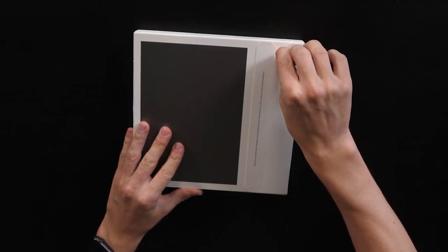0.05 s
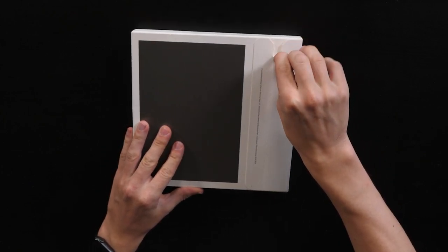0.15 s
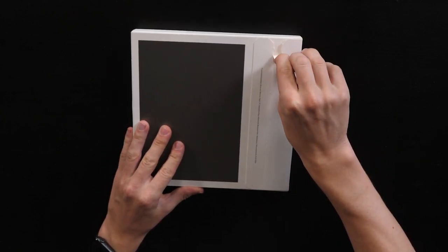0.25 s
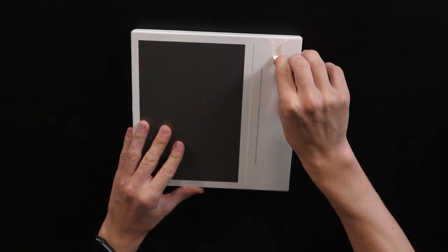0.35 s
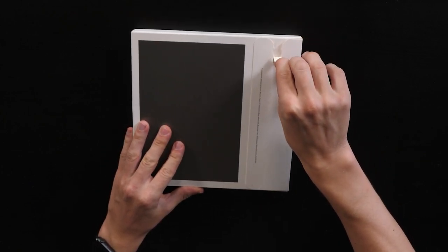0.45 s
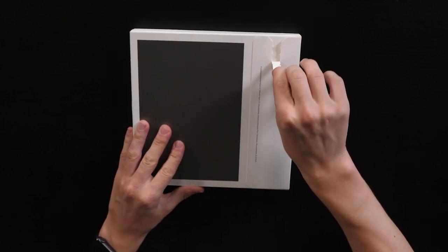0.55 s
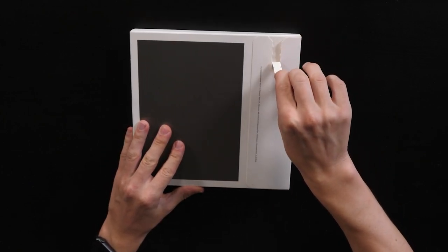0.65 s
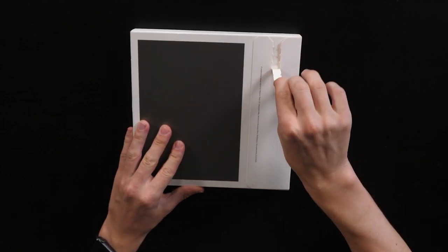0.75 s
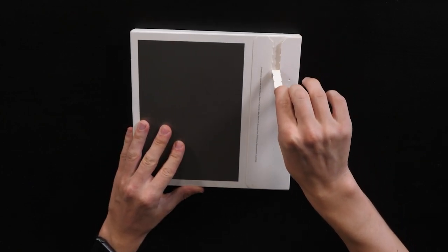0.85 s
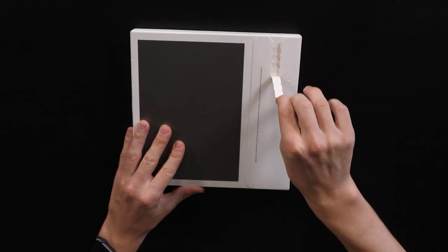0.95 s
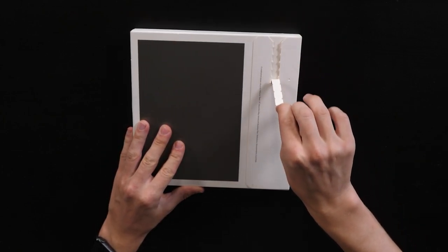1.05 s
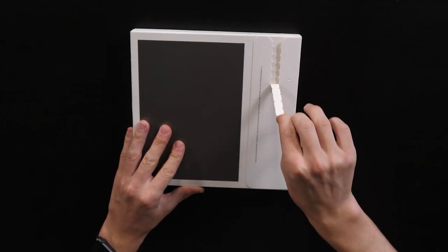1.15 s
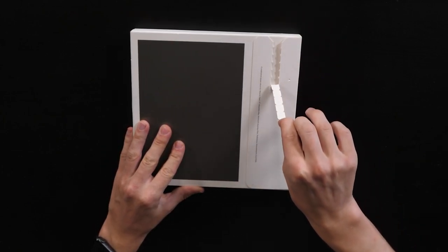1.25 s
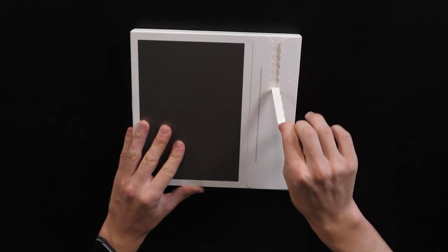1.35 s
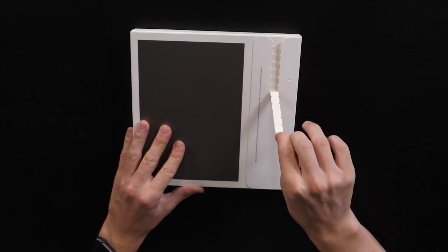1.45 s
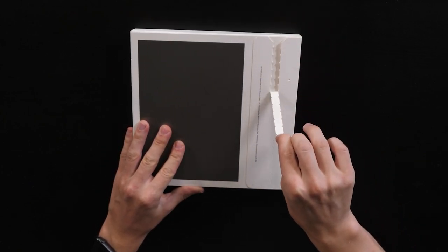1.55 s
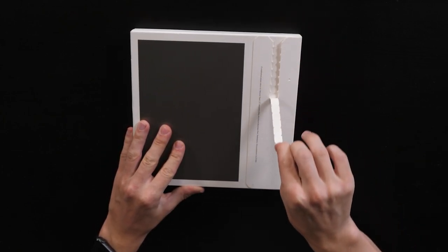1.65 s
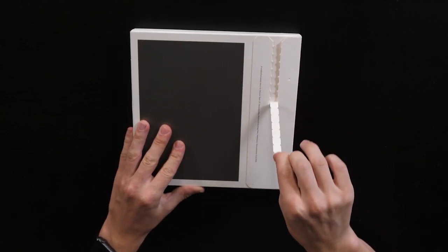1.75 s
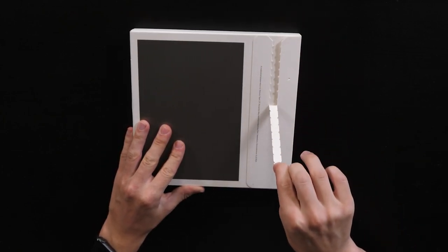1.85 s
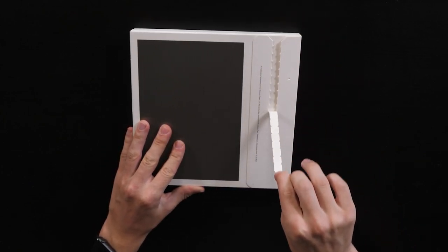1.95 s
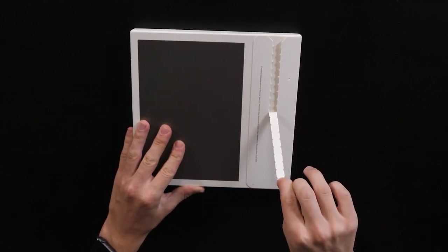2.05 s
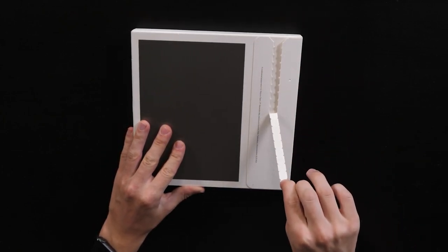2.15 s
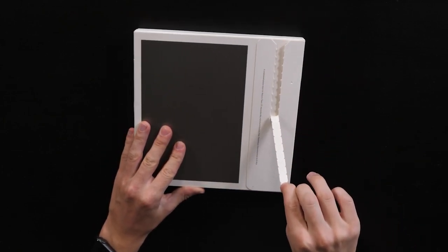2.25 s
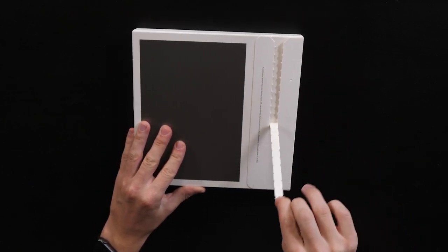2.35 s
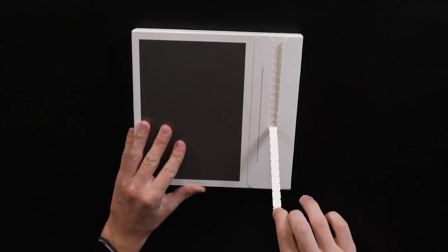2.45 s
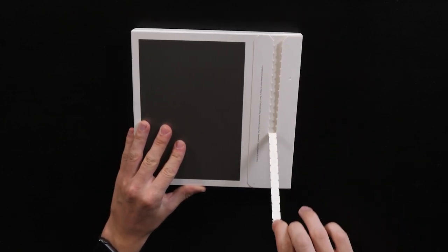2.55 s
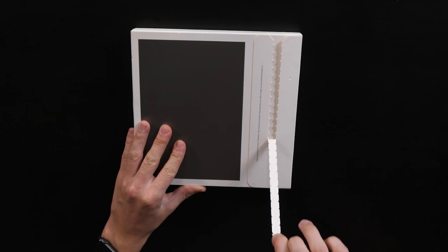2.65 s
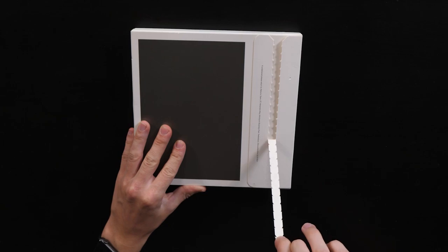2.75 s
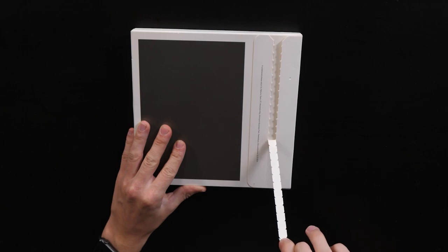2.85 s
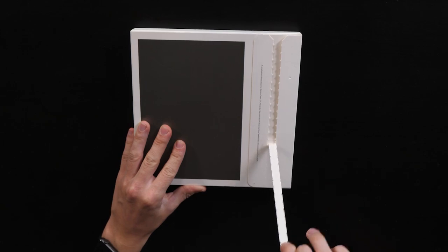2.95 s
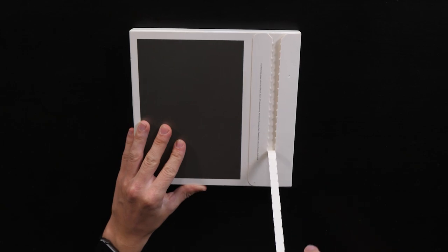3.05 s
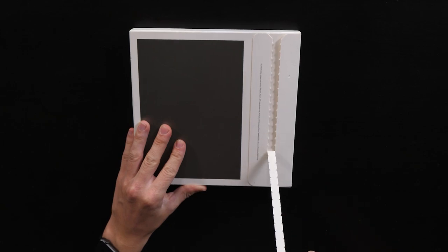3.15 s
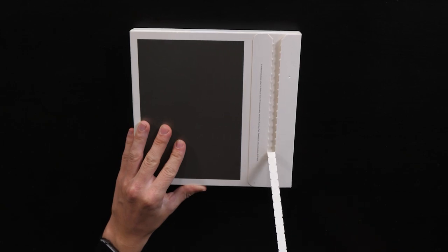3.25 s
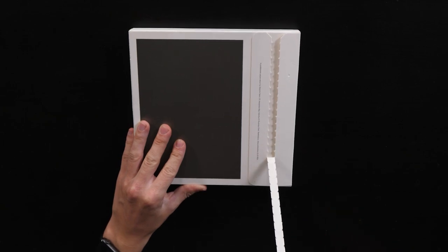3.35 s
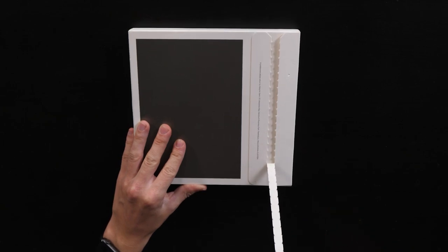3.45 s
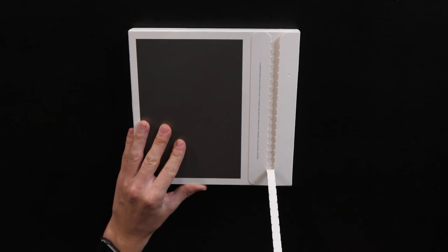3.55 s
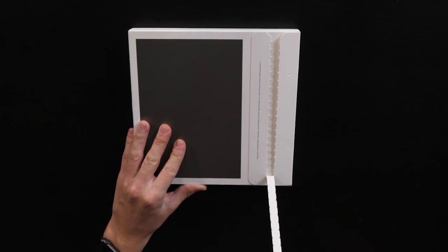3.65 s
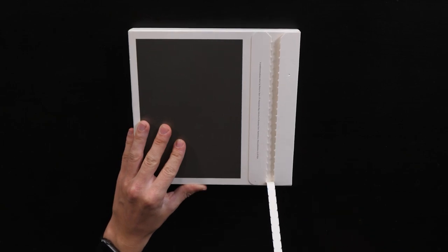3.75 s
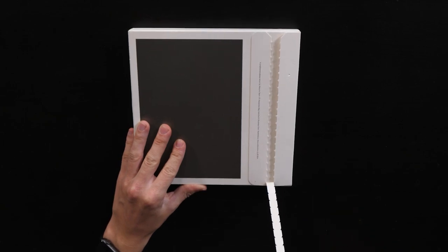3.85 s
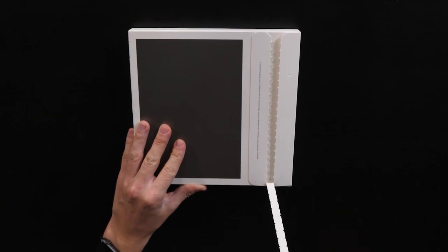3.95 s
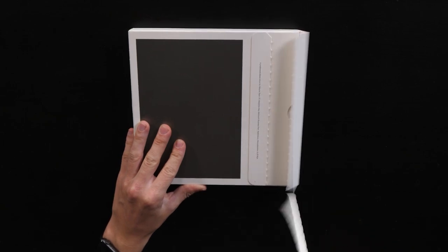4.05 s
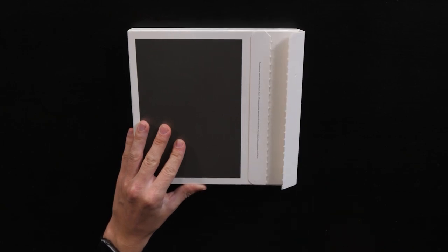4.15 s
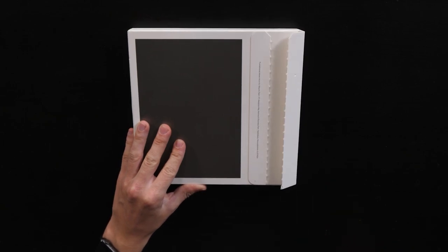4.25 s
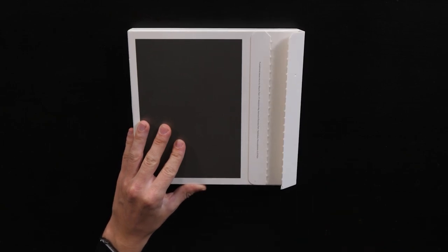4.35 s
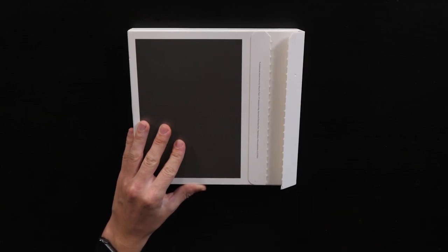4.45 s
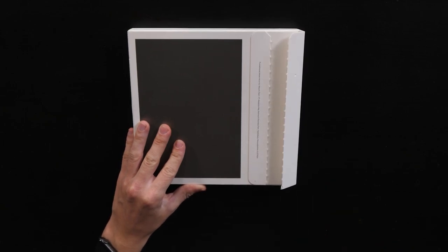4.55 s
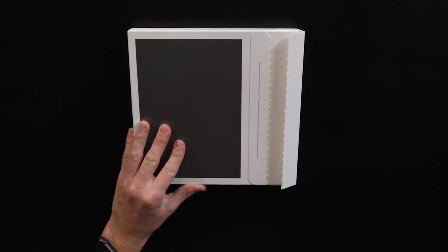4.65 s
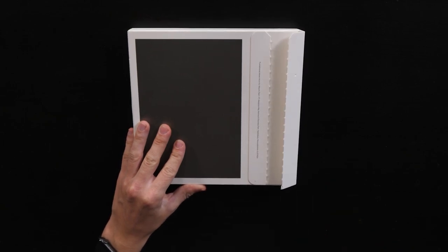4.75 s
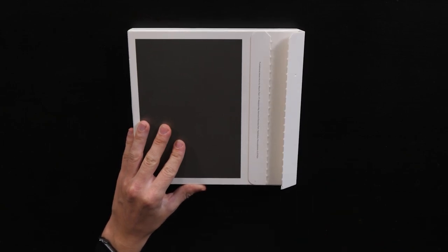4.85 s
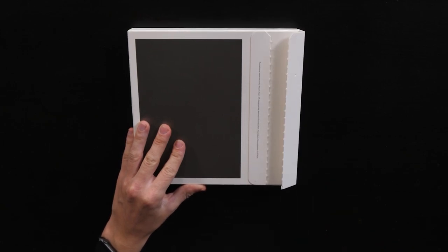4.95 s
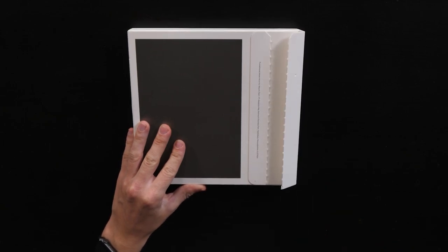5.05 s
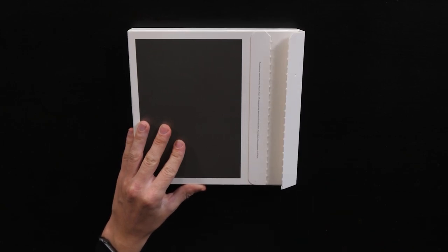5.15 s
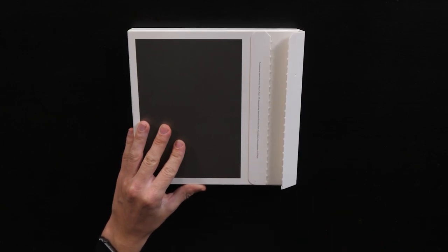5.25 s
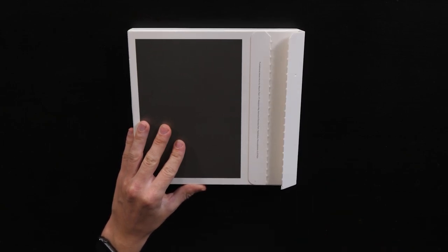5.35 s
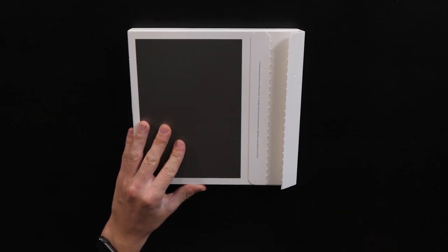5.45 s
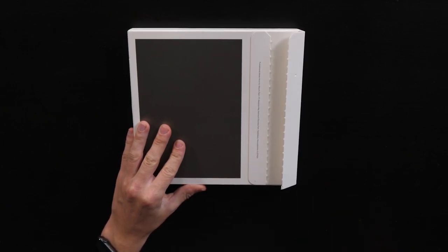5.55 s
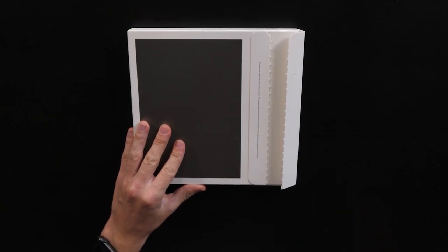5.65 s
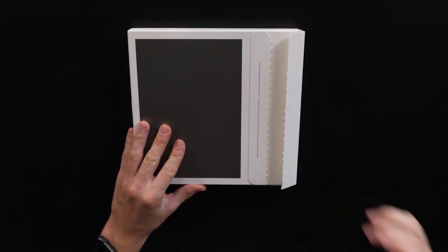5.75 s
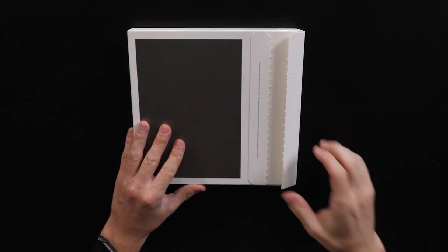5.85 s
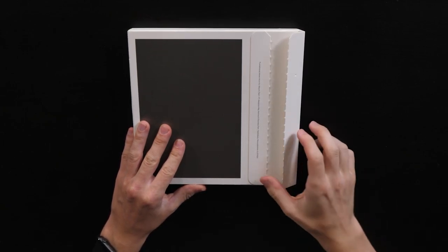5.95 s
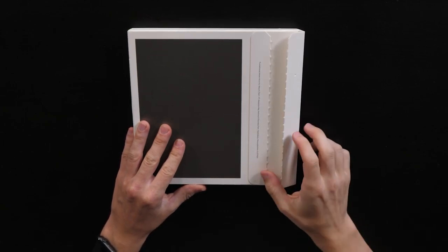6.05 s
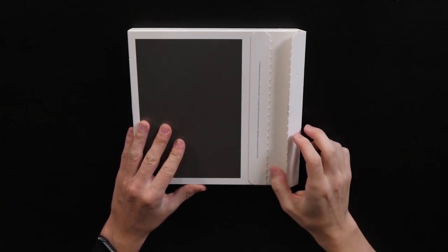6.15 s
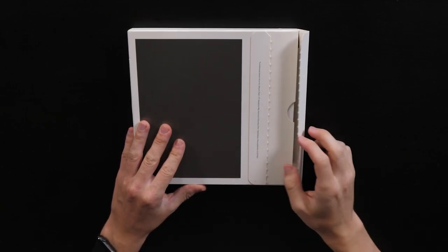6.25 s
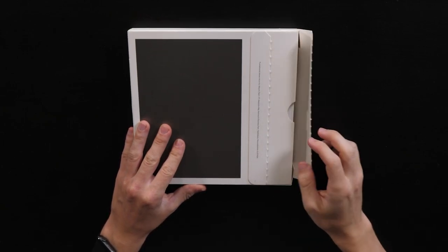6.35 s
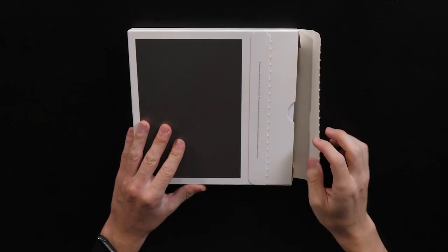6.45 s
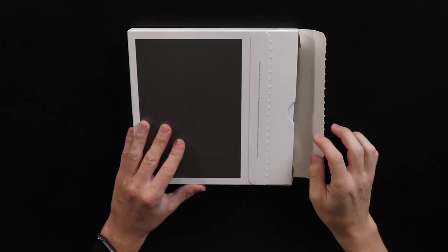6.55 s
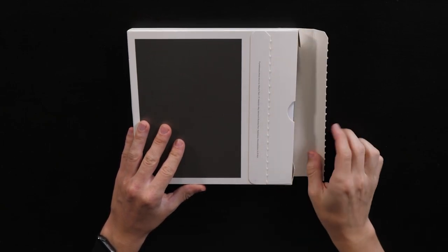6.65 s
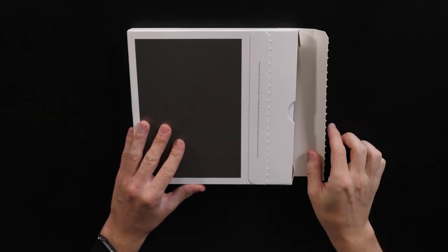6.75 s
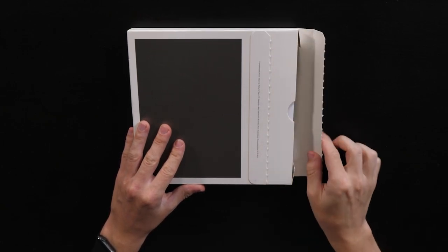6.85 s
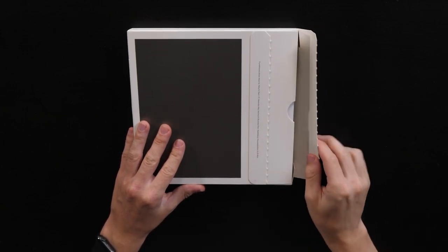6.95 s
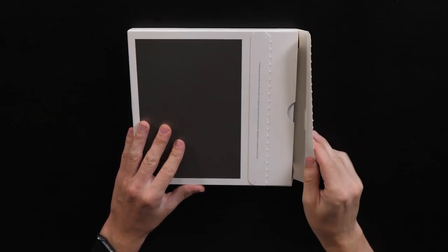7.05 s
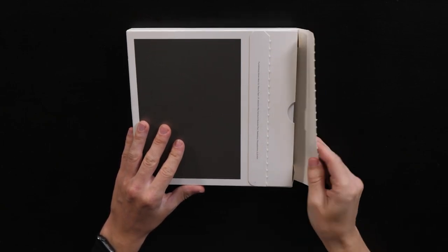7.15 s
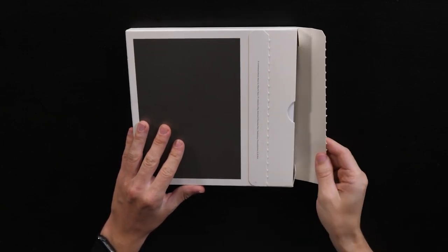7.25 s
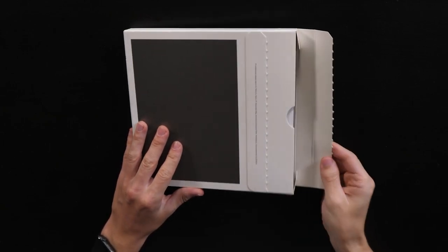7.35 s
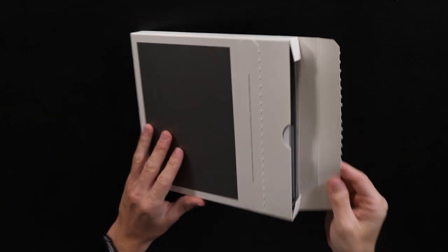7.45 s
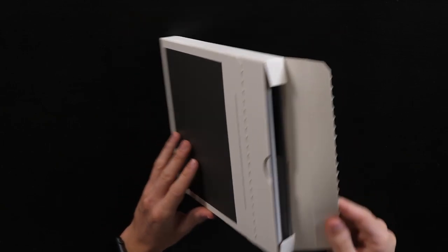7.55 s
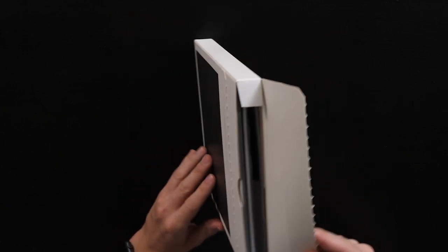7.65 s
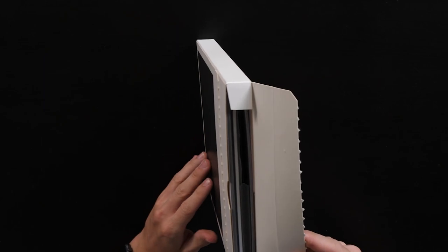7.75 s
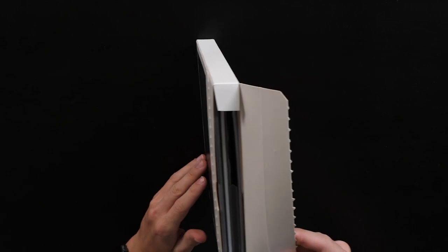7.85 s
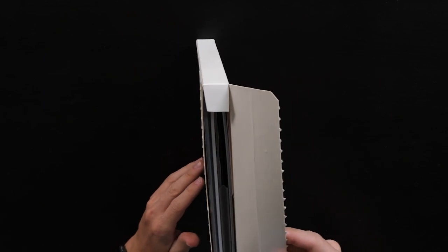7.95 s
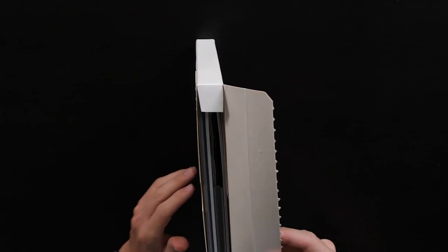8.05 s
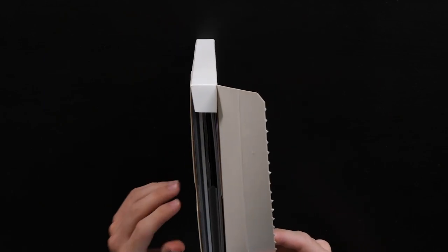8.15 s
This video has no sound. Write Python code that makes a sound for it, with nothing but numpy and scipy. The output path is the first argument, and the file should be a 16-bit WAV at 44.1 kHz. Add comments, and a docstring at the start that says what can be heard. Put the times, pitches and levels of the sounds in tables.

```python
"""In a small quiet room, the tear strip of a cardboard mailer is pulled open on a table, close to the microphone.
Each bridge of the perforation frays, then snaps and rings the strip and the hollow box: noise bursts in resonances.
Paper fibres crackle between the snaps as random clicks, and the freed flap rings as fading sine waves.
After a pause a hand bumps the box, folds the flap back and slides the box up on to its edge: filtered
noise for the bumps, dense clicks for the rubbing. Room echoes and a soft ventilation drone surround it."""
import sys
import numpy as np
from scipy import signal
from scipy.fft import rfft, irfft, next_fast_len
from scipy.io import wavfile
from scipy.ndimage import uniform_filter1d

SR = 44100
rng = np.random.default_rng(int(sys.argv[2]) if len(sys.argv) > 2 else 0)


def transcribe(u):
    """Save the signal u as a 16-bit wav file named by the first command-line argument.

    u: samples, shape (n,) or (channels, n), limited to [-1, 1]; the rate is SR.
    q: integer samples, one column per channel.
    """
    v = np.clip(np.atleast_2d(u).T, -1, 1)
    q = np.round(v * 32767).astype(np.int16)
    wavfile.write(sys.argv[1], SR, q)


N = 362061
TIME = np.arange(N) / SR  # seconds

# tone colour of the card: f/Hz, level/dB
CARD_TONE = [(250, -26.5), (600, 4), (900, -0.5), (1900, 2), (2800, -1), (3900, -0.5), (5200, -15.5),
             (9000, -32.5)]
# tone colour of parting or rubbed paper fibres: f/Hz, level/dB
FIBRE_TONE = [(2500, -30), (5000, 0), (7500, 2.5), (10000, -3), (12200, -1), (16000, -7.5)]
# tone colour of the low rumble: f/Hz, level/dB
RUMBLE_TONE = [(50, -16.5), (100, -3), (170, 0), (300, 1.5), (450, -1.5), (700, -4.5), (1100, -35)]
# tone colour of fingers or the box sliding: f/Hz, level/dB
SLIDE_TONE = [(300, -20), (700, 0.5), (1300, 0.5), (2200, 0.5), (3000, -2), (3500, 3.5), (4100, -0.5),
              (4800, -14), (9000, -28.5)]


def undb(db):
    """Turn decibels into a gain."""
    return 10 ** (np.asarray(db) / 20)


def unit(x):
    """Scale to rms 1."""
    return x / np.sqrt(np.mean(x ** 2))


def unit_energy(x):
    """Scale to energy 1 (the sum of the squares)."""
    return x / np.sqrt(np.sum(x ** 2))


def read(points, hz):
    """Read a value between (Hz, value) points, on a log-frequency axis."""
    f, value = np.transpose(points)
    return np.interp(np.log(hz), np.log(f), value)


def colour(x, points):
    """Shape a full-length sound by a tone colour."""
    size = next_fast_len(N, real=True)
    hz = np.maximum(np.fft.rfftfreq(size, 1 / SR), 1)
    spectrum = rfft(x, size) * undb(read(points, hz))
    return irfft(spectrum, size)[:N]


def response(points, size=512):
    """Turn a tone colour into a short click that starts at once (minimum phase)."""
    hz = np.maximum(np.fft.rfftfreq(size, 1 / SR), 1)
    cepstrum = irfft(np.log(undb(read(points, hz))))
    # fold the second half on to the first, so that nothing sounds before the start
    cepstrum[1:size // 2] *= 2
    cepstrum[size // 2 + 1:] = 0
    return irfft(np.exp(rfft(cepstrum)))


def through(x, impulse):
    """Pass x through an impulse response and keep its length."""
    return signal.fftconvolve(x, impulse)[:len(x)]


def colour_white(x, points):
    """Colour a white sound without changing its expected power."""
    return through(x, unit_energy(response(points)))


def resonate(x, hz, width):
    """One resonance, with gain 1 at its centre."""
    return signal.lfilter(*signal.iirpeak(hz, hz / width, fs=SR), x)


def fade(t, t60):
    """Fall by 60 dB in t60 seconds."""
    return np.exp(-np.log(1000) * t / t60)


def swell(start, length, attack, release):
    """Loudness curve (s) that rises to 1 at its start, holds, then dies away."""
    before = np.minimum(TIME - start, 0)
    past = np.maximum(TIME - start - length, 0)
    return np.exp(np.maximum(before / attack - past / release, -30))


def walk(rate):
    """Smooth random wander with about `rate` new values a second, spread near 1."""
    hold = int(SR / rate)
    steps = np.repeat(rng.standard_normal(N // hold + 1), hold)
    return unit(uniform_filter1d(steps, hold)[:N])


def grains(rate, spread_db):
    """Tiny clicks at random times, `rate` a second; a larger spread makes a few stand out."""
    count = int(rate * N / SR)
    place, chance, sign = rng.random((count, 3)).T
    level_db = spread_db * np.minimum(-np.log(1 - chance), 4)
    click = undb(level_db) * (2 * sign - 1)
    return unit(np.bincount((place * N).astype(int), click, N))


def add(track, s, x):
    """Mix x into the track at s seconds."""
    i = max(int(s * SR), 0)
    track[i:i + len(x)] += x[:max(N - i, 0)]


def background():
    """Still room air as coloured noise, with a soft ventilation drone of narrow noise bands."""
    # tone colour of the air: f/Hz, level/dB
    air_tone = [(13, -56), (22, -10.5), (55, -4), (87, -11), (140, -8), (165, -9), (278, -14), (376, -25),
                (420, -21), (653, -26), (885, -19.5), (2140, -36.5), (4380, -39), (5460, -43), (16000, -45)]
    # drone bands: f/Hz, width/Hz (each of the two passes is 1.2 times this), level/dB
    drone_bands = [(63, 11, -62), (139.2, 7.2, -68), (274.9, 11, -73.5), (876, 250, -76.5),
                   (3804, 770, -82.5)]
    drone = 0
    for hz, width, db in drone_bands:
        once = resonate(rng.standard_normal(N), hz, 1.2 * width)
        drone = drone + undb(db) * unit(resonate(once, hz, 1.2 * width))
    return drone + undb(-56) * unit(colour(rng.standard_normal(N), air_tone))


def box_ring(kick):
    """The panels and air of the box answer a push, each with its own resonance."""
    # resonances of the box: f/Hz, width/Hz, level/dB beside the others
    box_modes = [(71.5, 11, -10.5), (121, 28, 1.5), (180, 8.65, -9), (230, 2.1, -12), (304, 34, 2),
                 (457, 36, -1), (579, 55, -2), (812, 130, -5)]
    ring = 0
    for k, (hz, width, db) in enumerate(box_modes):
        ring = ring + (-1) ** k * undb(db) * resonate(kick, hz, width)
    return unit_energy(ring)


def peel(treble_db=-1, card_db=-3, tick_card_db=-7, body_db=-12, clump_db=4):
    """Fine fibres crackle in clumps, coarse ones tick singly as the strip lifts; the lid passes it to the box."""
    # tone colour of the bare crackle: f/Hz, level/dB
    peel_tone = [(2500, -23), (4500, 2.5), (7500, 1.5), (10000, -2), (12500, 3.5), (14500, -5.5),
                 (16000, -13)]
    # the hand pulls in tugs: start t/s, length t/s, level/dB of the pull (before the mix levels above)
    tugs = [(.18, .08, -56), (0.438, 0.027, -54), (0.559, .13, -53), (0.758, .39, -54.5),
            (1.229, 0.077, -55.5), (1.411, .12, -56.5), (1.677, .31, -54.5), (2.073, 0.02, -58),
            (2.219, 0.017, -66), (2.368, 0.39, -57), (3.017, 0.13, -55), (3.297, 0.36, -62),
            (3.543, 0.28, -55), (4.085, 0.066, -50.5)]
    attack_s, release_s = 0.012, 0.015  # time constants
    # a faint crackle runs under and between the tugs
    faint_start_s, faint_end_s, faint_db = 0.043, 4.1, -70.5
    pull = undb(faint_db) * swell(faint_start_s, faint_end_s - faint_start_s, attack_s, release_s)
    for s, length, db in tugs:
        pull = pull + undb(db) * swell(s, length, attack_s, release_s)
    fine = unit(grains(rate=2500, spread_db=3.5) * undb(clump_db * walk(rate=160)))
    coarse = grains(rate=170, spread_db=2.5)
    crackle = pull * unit(fine + coarse)
    body = through(crackle, box_ring(signal.unit_impulse(SR // 8)))
    card_input = undb(card_db) * crackle + undb(tick_card_db) * pull * coarse
    card = colour_white(card_input, CARD_TONE)
    treble = colour_white(crackle, peel_tone)
    return undb(treble_db) * treble + card + undb(body_db) * body


def room(x, onset_s=0.0022):
    """Diffuse echoes of a small room: noise in octave-spaced bands that fade; the treble dies first."""
    # strength of the echoes: f/Hz, level/dB beside the direct sound
    echo_level = [(80, -6.5), (300, -1), (700, -4), (1500, -7.5), (4000, -12.5), (8000, -6), (15000, -24.5)]
    # how long they take to fall by 60 dB: f/Hz, t/s
    echo_time = [(100, 0.2), (400, 0.25), (1500, 0.26), (4500, 0.25), (9000, 0.14), (15000, 0.05)]
    t = TIME[:SR // 2]
    noise = rfft(rng.standard_normal(len(t)))
    f = np.maximum(np.fft.rfftfreq(len(t), 1 / SR), 1)
    tail = 0
    for hz in SR / 2 ** np.arange(1, 11):
        band = irfft(noise * np.maximum(1 - abs(np.log2(f / hz)), 0), len(t))
        build_up = 1 - np.exp(-(t / onset_s) ** 2)
        decay = fade(t, read(echo_time, hz)) * build_up
        tail = tail + undb(read(echo_level, hz)) * band * unit_energy(decay)
    return through(x, tail)


def reflections(x):
    """The card faces now this way, now that, and so meets different paths through the room."""
    facing = walk(rate=4)
    return room(x * np.cos(facing)) + room(x * np.sin(facing))


def breaks():
    """List every snap of the card: both sides of each bridge, then the clicks of the folds."""
    # A bridge parts in two snaps, one on each side of the strip; the last side is usually the louder.
    # Last side: t/s, energy level/dB, treble level/dB beside that, box thud level/dB beside that (3 dB is
    # taken off later), card ring f/Hz, fraying t/ms; first side: how much earlier t/ms, level/dB beside the last
    bridges = [(.1048, -10.5, -4, -3, 2010, 3.6, 7.5, -16),
               (0.1831, 2.5, -8, -2.5, 2140, 0.56, 1.23, -19.5), (.471, -19.5, 0.5, 7, 750, 0.25, 31.6, -5),
               (0.559, -4, 3, -1.5, 2650, 1.7, 14.1, -13.5), (0.7302, -7.5, -5, -1.5, 2590, 1.6, 3.5, -18),
               (.8, -3, -3, -11, 4120, 2.9, 5.7, -11.5), (.9203, -9.5, -5, -2.5, 4300, 3.7, 20, -4),
               (0.9885, -5.5, -5.5, -4, 795, 6, 4.6, -4), (1.0898, -10, -2, -1, 2370, 4.1, 25, -22),
               (1.132, -5.5, -2, -5.5, 3600, 2.5, 4.1, -22), (1.2959, -16.5, -1, 3, 740, 2.2, 13.7, -3.5),
               (1.4341, -2.5, -2.5, 0.5, 1060, 0.67, 2.56, -17),
               (1.7089, 2.5, -3.5, -11, 1710, 3.1, 23.3, -13),
               (1.831, 2, -8.5, -0.5, 1370, 4.4, 13.5, -5.5), (1.9872, -7, -6, -2.5, 1520, 13, 14.5, -2.5),
               (2.3577, 1.5, -9.5, -5, 1480, 2, 4.5, -5), (2.4444, 2.5, -11, -5, 1420, 2.3, 10.3, -4),
               (2.558, 1.5, -6, -2, 2000, 2.6, 4.4, -17.5), (2.6742, 3.5, -9, -11, 1890, 4.4, 5, -15.5),
               (3.033, 4.5, -10.5, -13.5, 1900, 2.6, 3.55, -6), (3.1095, 3, -4.5, -7, 3900, 2.7, 8, -9),
               (3.3942, 3, -8.5, -3.5, 2920, 1.3, 2, -13), (3.4769, 1.5, -6.5, -1.5, 1580, 1.8, 3, 1),
               (3.5814, .5, -3.5, -4.5, 1490, 1.3, 6.3, -14.5), (3.6862, 0, -4, -6.5, 2060, 3.3, 2.9, -22),
               (3.7927, -4, 1, -2, 736, 1.8, 9, -4.5), (4.067, -14.5, -3.5, -30, 3170, 4, 1.7, -14),
               (4.1051, 2, -7, -0.5, 1280, 5, 18, -18), (4.1498, 0.5, -15.5, -7, 1400, 5.7, 8, -13)]
    # The folds of the flap click as they bend: t/s, energy level/dB, treble level/dB beside that,
    # box thud level/dB beside that (3 dB is taken off later), card ring f/Hz, creaking t/ms
    fold_clicks = [(6.201, -32.5, -16, -10, 3220, 2.1), (7.2974, -17.5, -28, -3.5, 1480, 6.3),
                   (7.346, -26, -17, -5, 2420, 2.7), (7.491, -17, -24, -6, 1910, 1.7),
                   (7.8558, -20.5, -13, -12, 3600, .43), (7.924, -25.5, -24, -15, 3390, .6)]
    # the first side snaps while the strip is still taut
    first_treble_db, first_thud_db, first_ring_hz = 4.5, -1.5, 2100
    first_fray_share = 0.76  # its fraying time, as a share of the last side's
    rows = []
    for s, db, treble_db, thud_db, hz, fray_ms, early_ms, first_db in bridges:
        rows.append((s - early_ms / 1000, db + first_db, treble_db + first_treble_db,
                     thud_db + first_thud_db, first_ring_hz, first_fray_share * fray_ms))
        rows.append((s, db, treble_db, thud_db, hz, fray_ms))
    return rows + fold_clicks


def snaps(strain_db=-36, strain_ms=11, fray_db=-9, release_ms=0.91, crack_db=-5,
          ring_db=6, ring_q=8, side_db=-3, side_q=14,
          flex_db=-7, flex_ms=9, thud_cut_db=-3, air_hz=123, air_t60=0.17):
    """Fibres give way faster and faster, the bridge cracks, and the released card kicks the box."""
    # the box's low air thump is weak at first, strongest near 2.35 s, then eases:
    # t/s, level/dB beside the snap's box thud
    air_thump = [(0, -15), (1.9, -20), (2.35, 0), (3.8, -5), (4.1, -6.5)]
    out = np.zeros(N)
    card, fibre = response(CARD_TONE), response(FIBRE_TONE)
    lead_s = 0.04  # room for the fraying before the crack
    ms = (np.arange(SR // 7) / SR - lead_s) * 1000
    after = ms >= 0
    crack = np.argmax(after)  # sample at which the bridge gives way
    t = TIME[:SR // 4]
    swell_in = np.minimum(t * air_hz, 1)  # over one cycle
    air = unit_energy(np.sin(2 * np.pi * air_hz * t) * fade(t, air_t60) * swell_in)
    for s, db, treble_db, box_db, hz, fray_ms in breaks():
        noise = rng.standard_normal((3, len(ms)))
        strain = undb(strain_db) * np.exp(-abs(ms) / strain_ms)
        fraying = strain + undb(fray_db) * np.exp(-abs(ms) / max(fray_ms, .1))
        tension = np.where(after, np.exp(-abs(ms) / release_ms), fraying)
        force = unit_energy(noise[0] * np.sqrt(abs(noise[1])) * tension)
        force[crack] += undb(crack_db)
        # the free length of card, and so its main ring and its lesser ones, differs from bridge to bridge
        bend = through(force, card)
        lesser = sum(resonate(bend, f, f / side_q) for f in 1000 * 5 ** rng.random(size=7))
        main = resonate(bend, hz, hz / ring_q)
        ring = bend + undb(ring_db) * main + undb(side_db) * lesser
        # the box takes a kick, then flexes back for some milliseconds
        kick = undb(flex_db) * unit_energy(noise[2] * after * np.exp(-abs(ms) / flex_ms))
        kick[crack] += 1
        treble = unit_energy(through(force, fibre))
        sound = unit_energy(ring) + undb(treble_db) * treble
        thud_db = box_db + thud_cut_db
        add(out, s - lead_s, undb(db) * (sound + undb(thud_db) * box_ring(kick)))
        air_db = np.interp(s, *np.transpose(air_thump))
        add(out, s, undb(db + thud_db + air_db) * air)
    return out


def knocks(settle_t60=0.13, scuff_t60=0.19, dull_db=-4):
    """A soft contact of hand or table pushes the box, which settles on the table with a scuff."""
    # t/s, energy level/dB of the box ring, upper limit of the soft push f/Hz, scuff level/dB beside the ring
    contacts = [(0.184, -1.5, 70, -32), (4.107, -3, 80, -23), (5.988, -7.5, 327, -8),
                (6.836, -14.5, 130, -8), (7.593, -14, 170, -1)]
    out = np.zeros(N)
    t = TIME[:SR // 3]
    for s, db, soft_hz, scuff_db in contacts:
        noise = rng.standard_normal((2, len(t)))
        push = unit_energy(noise[0] * fade(t, settle_t60))
        push[0] += 1
        push = signal.lfilter(*signal.butter(2, soft_hz, fs=SR), push)
        scuff = unit_energy(through(noise[1] * fade(t, scuff_t60), response(CARD_TONE)))
        dull = unit_energy(through(push, response(RUMBLE_TONE)))
        add(out, s, undb(db) * (box_ring(push) + undb(dull_db) * dull + undb(scuff_db) * scuff))
    return out


def grip():
    """Fingers slip on the strip and the lid: dense clicks in the tone of sliding card."""
    # start t/s, length t/s, level/dB
    slip_times = [(2.26, 0.053, -57), (2.52, 0.23, -56.5), (3.29, .03, -67), (4.2, 0.25, -70.5),
                  (4.802, 0.0032, -65), (4.9, .003, -71.5), (5.372, .005, -66.5)]
    attack_s, release_s = 0.015, 0.025  # time constants
    pressure = 0
    for s, length, db in slip_times:
        pressure = pressure + undb(db) * swell(s, length, attack_s, release_s)
    return pressure * unit(colour(grains(rate=2700, spread_db=2.0), SLIDE_TONE))


def flap(start_s=4.149, rasp_db=-41, rasp_hz=3900, rasp_width=1300, rasp_t60=0.32):
    """The last bridge lets the flap spring free: it rings as fading sines and its torn edge rasps."""
    # rings of the flap: f/Hz, time to fall by 60 dB t/s, starting level/dB
    flap_modes = [(71, 0.69, -44.5), (315, 0.065, -27), (931, 0.18, -31.5), (993, 0.2, -31),
                  (1037, 0.25, -35), (1304, 0.15, -39), (1470, 0.22, -39.5)]
    out = np.zeros(N)
    t = TIME[:SR // 2]
    once = resonate(rng.standard_normal(len(t)), rasp_hz, rasp_width)
    rasp = unit(resonate(once, rasp_hz, rasp_width))
    ring = sum(undb(db) * np.sin(2 * np.pi * hz * t) * fade(t, t60) for hz, t60, db in flap_modes)
    add(out, start_s, ring + undb(rasp_db) * rasp * fade(t, rasp_t60))
    return out


def rub(scrape_db=0.5, hiss_db=-1, rumble_db=-3, slide_db=-1.5, slide_rumble_db=-1.5,
        catch_db=1.5, ring_db=2, ring_q=22, shift_db=5):
    """Dense stick-slip clicks catch and let go, sound in the card's face and rumble in the box."""
    # tone colour of the flap being stroked: f/Hz, level/dB
    stroke_tone = [(300, -9), (600, -10), (850, -2.5), (1150, 5.5), (1650, 2.5), (2100, -3), (2800, -1),
                   (3350, 0), (4000, -6.5), (5000, -12), (9000, -35.5)]
    # In both tables below, the settings above are added to the levels.
    # strokes of hand and flap over the card: start t/s, length t/s, level/dB,
    # treble level/dB beside that, box rumble level/dB beside that
    strokes = [(6.058, 0.19, -63, -17, 7.5), (6.331, 0.28, -62.5, -12.5, -2), (6.695, .02, -50, -14, -3),
               (6.764, 0.092, -56.5, -36, 1), (6.952, 0.022, -40.5, -24, -9.5),
               (7.038, 0.094, -58, -17, 2.5), (7.179, 0.084, -51.5, -11.5, -0.5),
               (7.864, 0.18, -70.5, -14, 0)]
    # the box slides up on to its edge: t/s, level/dB, treble level/dB beside that, box rumble level/dB beside that
    slide_path = [(7.4, -58, -17, -1), (7.424, -67, -26, 4), (7.446, -52.5, -23, -12),
                  (7.496, -42.5, -18, -5.5), (7.532, -45.5, -9.5, -12), (7.652, -32.5, -24, -10),
                  (7.728, -35, -10, -9), (7.804, -60.5, -16, -1), (7.85, -70, -15, -10)]
    attack_s, release_s = 0.022, 0.026  # time constants
    slips = grains(rate=3000, spread_db=0) * undb(catch_db * walk(rate=130))
    # the moving contact wakes now one, now another of the face's resonances
    rings = 0
    for hz in np.geomspace(900, 4200, num=10):
        rings = rings + undb(shift_db * walk(rate=16)) * resonate(slips, hz, hz / ring_q)
    face = slips + undb(ring_db) * rings
    scrape = unit(colour(face, stroke_tone))
    hiss = unit(colour(slips, FIBRE_TONE))
    rumble = unit(colour(slips, RUMBLE_TONE))
    out = 0
    for s, length, db, treble_db, box_db in strokes:
        pressure = undb(db) * swell(s, length, attack_s, release_s)
        treble = undb(treble_db + hiss_db) * hiss
        low = undb(box_db + rumble_db) * rumble
        out = out + pressure * (undb(scrape_db) * scrape + treble + low)
    s, *columns = np.transpose(slide_path)
    db, treble_db, box_db = (np.interp(TIME, s, c) for c in columns)
    pressure = undb(db + slide_db) * swell(s[0], s[-1] - s[0], attack_s, release_s)
    slide = unit(colour(face, SLIDE_TONE))
    low = undb(box_db + slide_rumble_db) * rumble
    return out + pressure * (slide + undb(treble_db) * hiss + low)


def scene():
    """Add up the box, its reflections, the freed flap (without echoes) and the room's own noise."""
    box = snaps() + knocks() + peel() + grip() + rub()
    return (box + reflections(box) + flap() + background())[None]


def record(dry):
    """The recorder cuts the top above 16 kHz with a steep filter."""
    return signal.sosfilt(signal.ellip(10, .2, 70, 16000, fs=SR, output="sos"), dry)


dry = scene()
out = record(dry)
transcribe(out)
```